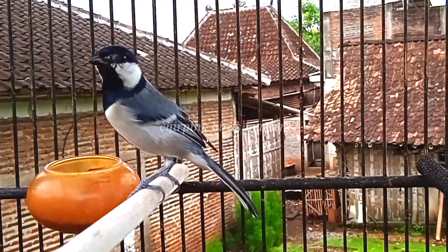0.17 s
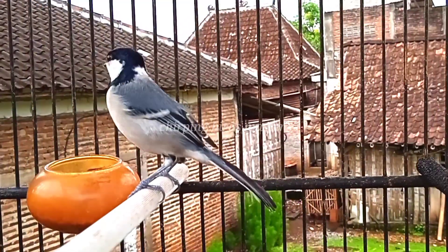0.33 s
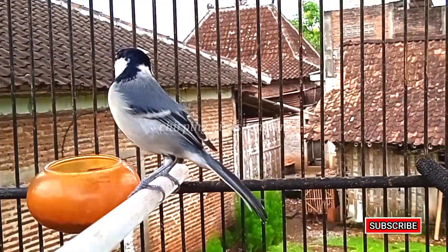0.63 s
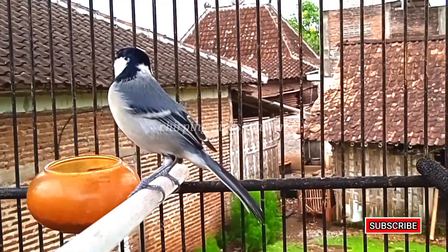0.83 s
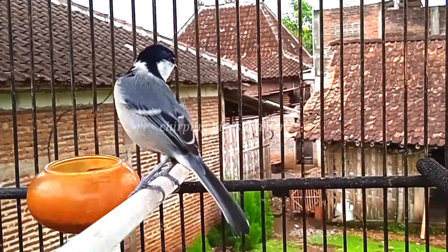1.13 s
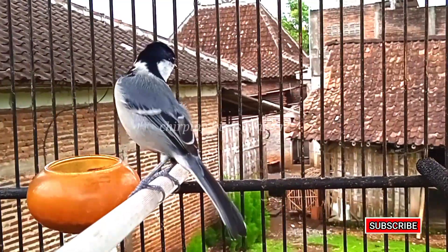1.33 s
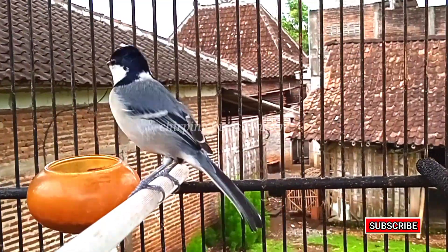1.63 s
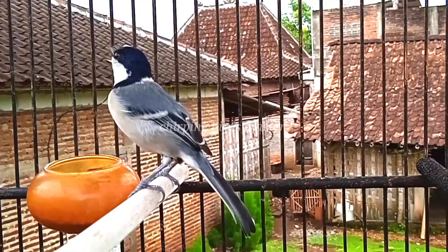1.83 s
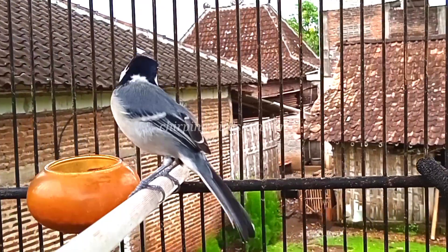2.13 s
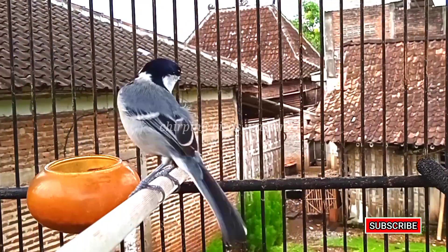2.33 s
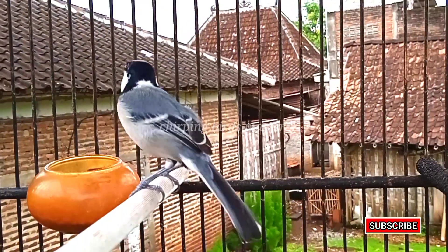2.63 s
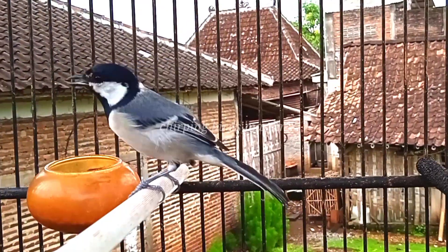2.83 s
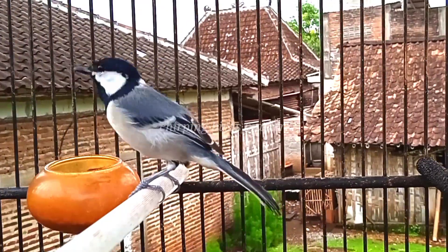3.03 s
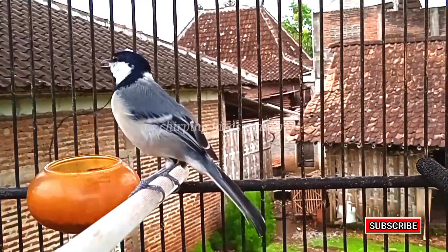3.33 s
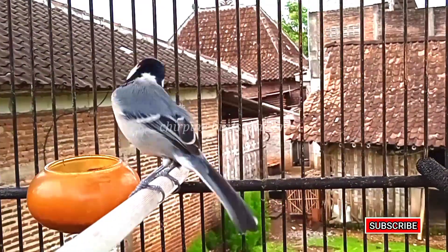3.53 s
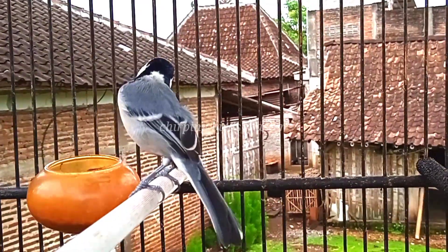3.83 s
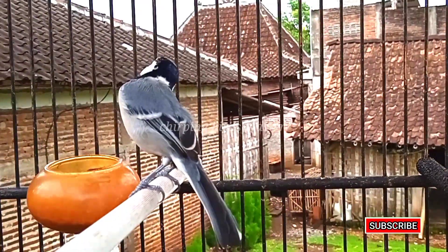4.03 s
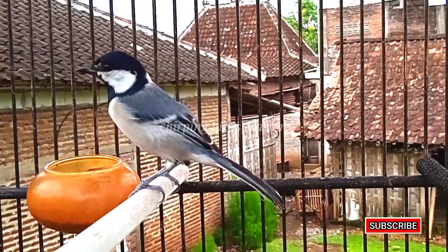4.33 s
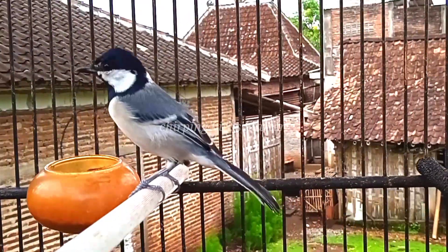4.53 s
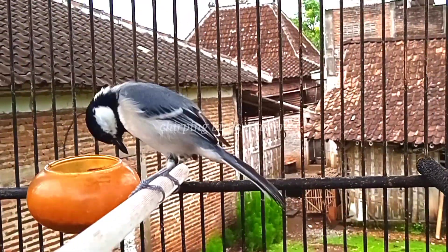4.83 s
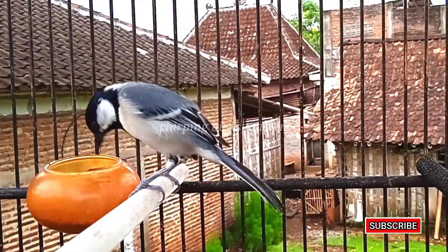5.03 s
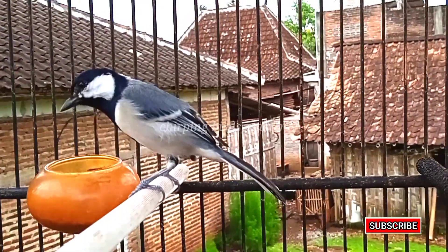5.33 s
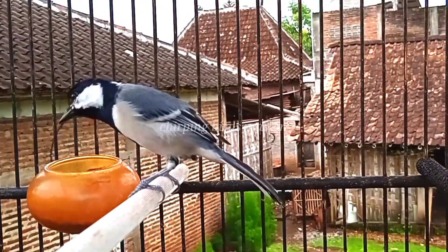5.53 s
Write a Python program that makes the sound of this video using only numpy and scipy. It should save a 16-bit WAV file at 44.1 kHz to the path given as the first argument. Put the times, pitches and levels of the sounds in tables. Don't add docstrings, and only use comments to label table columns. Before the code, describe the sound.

A small caged bird whistles five quick, high three-note phrases close by while a slow puttering engine passes and fades behind a walled yard.

```python
import sys
import numpy as np
from scipy import signal
from scipy.fft import rfft, irfft, next_fast_len
from scipy.io import wavfile
from scipy.ndimage import uniform_filter1d, map_coordinates

SR = 44100
rng = np.random.default_rng(int(sys.argv[2]) if len(sys.argv) > 2 else 0)


def master(y):
    cut = np.clip(np.atleast_2d(y).T, -1, 1)
    pcm = np.round(cut * 32767)
    wavfile.write(sys.argv[1], SR, pcm.astype(np.int16))


def to_linear_factor(level_db):
    exponent = np.asarray(level_db, float) / 20
    return 10 ** exponent


N = 250488


def unit(x):
    return x / np.sqrt(np.mean(x ** 2) + 1e-20)


def along(points, hz):
    f, v = np.transpose(points)
    return np.interp(np.log(hz + 1), np.log(f + 1), v)


def curve(points):
    s, db = np.transpose(points)
    return np.interp(np.arange(N) / SR, s, db, -200, -200)


def swells(rows):
    return sum(to_linear_factor(db - fade * np.abs(np.arange(N) / SR - s)) for s, db, fade in rows)


def wobble(rate):
    knots = rng.standard_normal(int(N * rate / SR) + 4)
    return map_coordinates(knots, [np.arange(N) * rate / SR])


def smooth(size):
    once = uniform_filter1d(rng.standard_normal(SR // 5), size=size)
    return unit(uniform_filter1d(once, size=size))


def filtered(x, response):
    m = next_fast_len(N + SR // 2)
    return irfft(rfft(x, m) * response(np.fft.rfftfreq(m, 1 / SR)), m)[:N]


def rush(spectrum, patchy_db):
    z = signal.stft(rng.standard_normal(N + 512), nperseg=512)[2]
    field = uniform_filter1d(rng.standard_normal(z.shape), size=5, axis=0)
    field = uniform_filter1d(field, size=10, axis=1)
    noise = signal.istft(z * to_linear_factor(patchy_db * unit(field)), nperseg=512)[1][:N]
    return unit(filtered(noise, lambda hz: to_linear_factor(along(spectrum, hz))))


def narrow(hz, width_hz):
    return unit(filtered(rng.standard_normal(N), lambda f: 1 / (1 + (2 * (f - hz) / width_hz) ** 2)))


def add(track, s, sound):
    part = track[round(s * SR):][:len(sound)]
    part += sound[:len(part)]


# frequency [Hz], time to fall 60 dB [s].
YARD = [(200, 0.29), (1500, 0.26), (4000, 0.26), (5000, .42), (6500, .42), (9000, 0.22), (15000, 0.084)]
LUMPY_DB = 2.2


def yard(x, gap_ms):
    hz, t, z = signal.stft(rng.standard_normal(SR // 2), SR, nperseg=256)
    decay = to_linear_factor(-60 * t / along(YARD, hz)[:, None])
    tail = signal.istft(z * decay, SR, nperseg=256)[1]
    tail *= np.clip(np.arange(len(tail)) / (gap_ms * SR / 1000), 0, 1) ** 2
    tail *= to_linear_factor(LUMPY_DB * np.resize(smooth(size=120), len(tail)))
    return signal.fftconvolve(x, tail / np.linalg.norm(tail))


# start [s], peak level [dB].
FIRINGS = [(0.014, -24), (0.117, -24.5), (0.217, -22.5), (0.322, -23), (0.428, -22.5), (0.531, -17),
           (0.632, -24.5), (0.735, -21.5), (0.8365, -24.5), (0.937, -24.5), (1.0655, -29), (1.168, -29),
           (1.269, -36.5), (1.356, -40), (1.463, -40), (1.57, -37), (1.686, -38.5), (1.845, -33.5),
           (2.003, -39.5)]
# time [s], puff level over the firing [dB].
TAILPIPE = [(0, -19.5), (.43, -24.5), (.63, -21), (.85, -15.5), (1.07, -13.5), (1.2, -15), (1.5, -18),
            (1.7, -26), (5.68, -23)]
# time [s], level [dB].
PASSING = [(0, -47), (.27, -40.5), (.57, -41.5), (.8, -39.5), (1.0, -42), (1.2, -45), (1.5, -49),
           (2.5, -50), (3.4, -54.5), (4.0, -54.5), (4.7, -57), (5.68, -57)]
IDLE_FROM_S, IDLE_PERIOD_S, IDLE_JITTER_S = 2.165, .158, .02
IDLE_DB, IDLE_SCATTER_DB = 6, 4


def firings(count):
    chance = rng.standard_normal((count, 2))
    s = IDLE_FROM_S + IDLE_PERIOD_S * np.arange(count) + IDLE_JITTER_S * chance[:, 0]
    s = np.clip(s, 0, (N - 1) / SR)
    db = np.interp(s, *np.transpose(PASSING)) + IDLE_DB + IDLE_SCATTER_DB * chance[:, 1]
    everything = list(FIRINGS) + list(zip(s, db))
    return [(when, level, np.interp(when, *np.transpose(TAILPIPE))) for when, level in everything]


# centre [Hz], width [Hz], level [dB].
PIPE = [(153, 49, -9.5), (341, 123.5, 1.5), (526, 110, -1), (800, 97, -11.5), (1061.5, 73, -23)]
# frequency [Hz], level [dB].
PUFF = [(500, -18.5), (900, 8), (1500, 3), (2500, -4.5), (4500, -19), (6300, -17), (9000, -30.5),
        (15000, -43.5)]
RETURNS_DB = (-.5, 0, -1.5, -3, -8, -14)
ROUND_TRIP_S = .0083
CRACK_DB, CRACK_LAG_S = 47, .001
CRACK_HZ, CRACK_WIDTH_HZ = 900, 1500
WHIRR_DB, WHIRR_FADES, WALL_S = -77, 1.1, 1.75


def engine():
    def resonance(f, hz, width_hz):
        return 1j * f * width_hz / (hz * hz - f * f + 1j * f * width_hz)

    def muffled_pipe(f):
        pipe = sum((-1) ** k * to_linear_factor(db) * resonance(f, hz, width) for k, (hz, width, db) in enumerate(PIPE))
        return pipe / (1 + 1j * f / 900)

    def front(f):
        return resonance(f, CRACK_HZ, CRACK_WIDTH_HZ) / (1 + 1j * f / 2800) ** 4

    blows, puffs, cracks = np.zeros((3, N))
    t = np.arange(SR // 4) / SR
    for s, db, puff_db in firings(count=20):
        chance = rng.standard_normal((2, len(RETURNS_DB)))
        when = np.abs(np.arange(len(RETURNS_DB)) * ROUND_TRIP_S + 0.00036 * chance[0])
        blow = np.zeros(SR // 8)
        blow[(when * SR).astype(int)] = to_linear_factor(np.add(RETURNS_DB, 1.8 * chance[1]))
        add(blows, s, -to_linear_factor(db + 31.5) * blow)
        weaker = .55 ** np.cumsum(np.roll(blow > 0, 1))
        add(cracks, s + CRACK_LAG_S, to_linear_factor(db + 2 * puff_db + CRACK_DB) * blow * weaker)
        add(blows, s, to_linear_factor(db + 19) * yard(blow, gap_ms=30))
        puff = signal.fftconvolve(blow, to_linear_factor(-60 * t / .028))[:len(t)]
        puff += 1.2 * to_linear_factor(-60 * t / .02) + .17 * to_linear_factor(-60 * t / .5)
        add(puffs, s, to_linear_factor(db + puff_db - 6.6) * puff)

    rattle = 1 + .5 * puffs / (np.abs(uniform_filter1d(puffs, size=8000)) + 1e-6)
    whirr = to_linear_factor(WHIRR_DB + 5 + WHIRR_FADES * np.minimum(curve(PASSING) + 42, 0))
    whirr *= (np.arange(N) < WALL_S * SR) * rattle * narrow(6410, width_hz=910)
    return filtered(blows, muffled_pipe) + filtered(cracks, front) + puffs * rush(PUFF, patchy_db=3.1) + whirr


# frequency [Hz], level [dB].
RUMBLE = [(12, -42.5), (20, -20), (42, -6), (75, 1.5), (128, -4), (200, -11.5), (260, -47), (440, -120)]
DRONE = [(59, -39), (100, -19), (130, -8.5), (237, -2), (275, -10.5), (302, -6.5), (354, 3.5), (428, -12),
         (493, -6), (567, -15), (621, -12), (790, -13.5), (1100, -34), (1430, -55.5), (2420, -120)]
HISS = [(470, -34), (800, -5.5), (862, -2), (1190, -3.5), (1680, -5), (2050, -7.5), (2630, -8.5),
        (3340, -11.5), (6020, -18), (8130, -19.5), (12600, -43), (13900, -22.5), (16000, -38.5)]
# peak time [s], rumble level [dB].
GUSTS = [(.1, -57), (.57, -41), (1.22, -59), (3.02, -62.5), (3.55, -59), (4.3, -62.5), (4.93, -62.5)]
CALM_DB, GUST_DB_PER_S = -67, 69.5
HISS_DB, TYRE_DB = -68.3, -21


def air():
    near_db = curve(PASSING)
    wind = to_linear_factor(CALM_DB) + swells([(s, db, GUST_DB_PER_S) for s, db in GUSTS])
    rumble = wind * to_linear_factor(2.0 + 2.5 * wobble(7.0)) * rush(RUMBLE, patchy_db=-1.5)
    drone = to_linear_factor(near_db - 2 + .8 * wobble(12)) * rush(DRONE, patchy_db=.8)
    hiss = np.hypot(to_linear_factor(HISS_DB), to_linear_factor(near_db + TYRE_DB))
    return rumble + drone + hiss * to_linear_factor(3.5 + 1.0 * wobble(6)) * rush(HISS, patchy_db=1.0)


# frequency [Hz], width [Hz], level [dB].
TONES = [(13539, 25, -92), (13740, 18, -86), (13300, 20, -99)]
# start [s], end [s], level at the end [dB], swell up to it [dB].
INSECT = [
    (.53, 1.1, -74, 6),
    (4.26, 4.68, -73, 3),
    (5.27, 5.68, -72, 9.5),
]
# peak time [s], level [dB], fade to both sides [dB per s].
CRICKET = [
    (3.95, -76, 260),
    (4.27, -74, 250),
    (4.44, -78, 60),
    (5.4, -77, 45),
]
CRICKET_FROM_S, CRICKET_DB = 3.3, -93


def insects():
    spells = sum(to_linear_factor(curve([(start, db - swell_db), (end, db)]) - 2) for start, end, db, swell_db in INSECT)
    buzz = uniform_filter1d(spells, size=1500) * narrow(8120, width_hz=350)
    chirring = swells(CRICKET) + to_linear_factor(CRICKET_DB) * (np.arange(N) > CRICKET_FROM_S * SR)
    chirr = chirring * to_linear_factor(5 + 3 * wobble(14)) * narrow(3400, width_hz=90)
    lines = sum(to_linear_factor(db + 4 * wobble(3)) * narrow(hz, width) for hz, width, db in TONES)
    return buzz + chirr + lines


# start [s], length [s], start pitch [Hz], end pitch [Hz], level [dB].
CALLS_FAR = [(1.37, 0.055, 2600, 2400, -68), (1.574, 0.057, 2560, 2380, -64.5), (3.42, 0.1, 729, 692, -64),
             (3.599, 0.067, 746, 747, -57), (3.742, 0.071, 1400, 1392, -58),
             (4.361, 0.096, 673, 870, -59.5), (4.943, 0.044, 2120, 2036, -61),
             (5.118, 0.034, 798, 747, -57), (5.197, 0.0635, 972, 1194, -65),
             (5.407, 0.11, 1750, 2115, -57.5), (5.518, 0.15, 1106, 1150, -69),
             (5.646, 0.064, 2000, 2100, -53.5)]
# pitch [Hz], second overtone [dB].
FAR_OVERTONE = [(700, -13.5), (2000, -29)]


def far_birds():
    out = np.zeros(N)
    for s, length, start_hz, end_hz, db in CALLS_FAR:
        n = round(length * SR)
        glide = start_hz + (end_hz - start_hz) * np.sin(np.linspace(0, 1.9, n))
        phase = np.cumsum(glide) * 2 * np.pi / SR
        voice = np.sin(phase) + to_linear_factor(along(FAR_OVERTONE, start_hz)) * np.sin(2 * phase)
        call = to_linear_factor(db) * np.hanning(n) ** .5 * voice
        husky = .9 + .8 * smooth(size=120)[:n]
        add(out, s, .65 * call * husky)
        add(out, s, .9 * yard(call, gap_ms=5))
    return out


# frequency [Hz], level [dB].
BEAK = [(2000, 4.5), (7000, 10.5), (9500, 0.9), (11500, -9), (13000, -8), (15000, 1.5)]
HAZE = .09


def whistle(shape, span, bend, overtones, breath, tremor, delay_ms):
    ms = np.arange(SR // 5) * 1000 / SR - 80
    knots, hz, level_db = np.transpose(shape)
    rise, fall, pitch = bend

    def late(v):
        return np.interp(ms - delay_ms, ms, v)

    place = ms / np.where(ms < 0, rise, fall)
    glide = uniform_filter1d(pitch * np.interp(place, knots, hz), size=136)
    phase = late(np.cumsum(2 * np.pi * glide / SR))
    level = to_linear_factor(np.interp(place, knots, level_db)) * (ms > span[0]) * (ms < span[1])
    level = late(uniform_filter1d(uniform_filter1d(level, size=66), size=66))
    upper = late(breath) * np.sin(1.2 * phase)
    shaky = np.abs(level) ** .4 * (1 + 4 * late(tremor) + HAZE * late(unit(breath)))
    for k, db in zip((2, 3, 4), overtones):
        audible = k * glide < SR * .45
        upper = upper + to_linear_factor(db + along(BEAK, k * glide)) * shaky * np.sin(k * phase) * audible
    return np.array([np.sin(phase) * (1 + late(tremor)), upper]) * level


# time from the top of the arch [ms], pitch [Hz], level [dB].
LOW = [(-46, 3270, -25), (-21, 3700, -18.5), (-12, 3980, -0.2), (-6, 4240, -0.5), (0, 4640, 2),
       (5, 4490, 0.2), (12, 4070, 0), (20, 3750, -9.3), (32, 3450, -11)]
MIDDLE = [(-66, 4580, -27.5), (-40, 4860, -4.5), (-27, 5040, -1), (-17, 5420, -1), (-5, 6350, -4.5),
          (4.5, 6420, -2), (17, 5060, -1), (32, 4790, -2.3), (48, 5330, -12)]
HIGH = [(-46, 6250, -16.5), (-30, 6850, -5.6), (-20, 7240, -0.5), (-6, 8440, -5), (2, 8610, -6.3),
        (18, 8280, -5.8), (45, 7250, -1), (49, 7060, -3), (57, 6050, -18)]
# top of the arch [s], level [dB], pitch [factor],
# extra path off the perch [ms], extra path off the bars [ms].
NOTES = [
    [(1.843, -22.2, .991, .425, 2.17), (2.2948, -15, 1.001, .815, 1.695), (2.7674, -14, 1.003, 1.01, 2.155),
     (3.2438, -13, 1.006, 1.05, 3.45), (3.7029, -13.1, .991, 1.685, 2.19)],
    [(1.9944, -10.4, 1.025, .785, 1.25), (2.4468, -10.8, 1.004, .825, 1.405),
     (2.9252, -10.2, 1.001, .595, 1.22), (3.3943, -7.9, 1.002, .595, 1.235), (3.86, -9, .995, .74, 1.19)],
    [(2.136, -15, .995, .495, 1.38), (2.5977, -11.4, .989, .515, 1.1), (3.0822, -9.9, 1.025, .395, 1.085),
     (3.5435, -15.8, 1.019, .75, 3.6), (4.0104, -18.6, .992, .51, .945)],
]
# voice on [ms], voice off [ms], rise length [factor], its change each phrase [factor],
# fall length [factor].
KINDS = [
    (-40.5, 24.6, 1.06, -.04, .97),
    (-56.5, 36, 0.97, -.002, .91),
    (-35, 53.6, 1.085, -.06, 1.02),
]
# second, third and fourth overtone [dB].
OVERTONES = [
    (-35, -31.5, -37),
    (-31, -31, -63),
    (-26, -55, -60),
]
BREATH_DB = (-37, -52, -62)
TURN = (1.2, 1.2, .45)
BAR_GAIN = (.7, 1.3, .87)
# voice starts later [ms], ends later [ms],
# beak toward the microphone [dB], perch share [factor], bar share [factor].
PHRASES = [
    (1.9, -3, 8.5, .45, .48),
    (-.4, -1.2, 5.5, 0.49, .23),
    (0.088, 1.2, -1.3, .46, 0.32),
    (-1.45, 1.96, -1.7, .33, .27),
    (.1, 0.5, -3.5, .32, 0.58),
]
# centre [s], level [dB].
SPLIT = [
    (1.977, -45.5),
    (2.429, -48.5),
]
RISE_PER_PITCH, FALL_PER_PITCH = 3.5, 2.5
WET_DB, WET_OVERTONE_DB = -20.5, -12
AIMED = .45


def tit():
    song = np.zeros(N)
    kinds = zip((LOW, MIDDLE, HIGH), KINDS, TURN, BAR_GAIN, OVERTONES, BREATH_DB, NOTES)
    for shape, (on, off, rise, hurry, fall), turn, bars, overtones, breath_db, notes in kinds:
        usual_db = np.mean(notes, axis=0)[1]
        for k, (note, posture) in enumerate(zip(notes, PHRASES)):
            s, db, pitch, perch_ms, bar_ms = note
            later, longer, beak_db, perch_share, bar_share = posture
            span = on + later, off + longer
            sharp = pitch - 1
            bend = rise + hurry * k - RISE_PER_PITCH * sharp, fall - FALL_PER_PITCH * sharp, pitch
            breath = to_linear_factor(breath_db + .6 * beak_db) * smooth(size=12)
            tremor = .06 * smooth(size=70)
            colour = np.add(overtones, (turn * beak_db, 0, 0))
            direct, perch, bar = (whistle(shape, span, bend, colour, breath, tremor, delay_ms)
                                  for delay_ms in (0, perch_ms, bar_ms))
            near = np.sum(direct + perch_share * perch + bars * bar_share * bar, axis=0)
            add(song, s - .08, to_linear_factor(db) * near)
            walls = yard(to_linear_factor([WET_DB, WET_OVERTONE_DB]) @ direct, gap_ms=8)
            add(song, s - .08, to_linear_factor(db + AIMED * (usual_db - db)) * walls)
    t = np.arange(-600, 600) / SR
    for s, db in SPLIT:
        split = np.sin(2 * np.pi * 8050 * t) + 0.39 * np.sin(2 * np.pi * 2680 * t)
        add(song, s + t[0], to_linear_factor(db) * np.exp(-(t / 0.0047) ** 2) * split)
    return song


# start [s], peak level [dB], thump pitch [Hz].
JOLTS = [(4.227, -40, 76), (4.33, -44, 76), (4.561, -42, 110), (4.625, -46, 80), (4.668, -38.5, 75),
         (4.827, -32, 89), (4.898, -39, 60), (5.24, -47.5, 150)]
# start [s], peak level [dB].
PECKS = [
    (4.9606, -51),
    (5.0714, -52.5),
    (5.2446, -56),
]


def cage():
    thumps, ticks = np.zeros((2, N))
    t = np.arange(SR // 8) / SR
    for s, db, hz in JOLTS:
        swing = (1 - np.exp(-t / .003)) * np.sin(2 * np.pi * hz * t)
        add(thumps, s, -to_linear_factor(db + 6 - 60 * t / .06) * swing)
    for s, db in PECKS:
        add(ticks, s, to_linear_factor(db - 3 - 60 * t / 0.13) * rng.standard_normal(len(t)))
    bowl = [(900, -29), (2100, -4), (6000, -3), (9000, -14), (14000, -28.5)]  # (Hz, dB)
    return thumps + filtered(ticks, lambda hz: to_linear_factor(along(bowl, hz)))


def scene():
    return (engine() + air() + insects() + far_birds() + tit() + cage())[None]


def low_pass(x):
    return signal.sosfilt(signal.butter(12, 16800, fs=SR, output="sos"), x)


def record(dry):
    top_hz, bass_hz = 15800, 50

    def mic(hz):
        return np.clip((top_hz - hz) / 160, 0, 1) ** 2 * hz ** 2 / (hz ** 2 + bass_hz ** 2)

    return low_pass(filtered(dry[0], mic)[None])


dry = scene()
out = record(dry)
master(out)
```